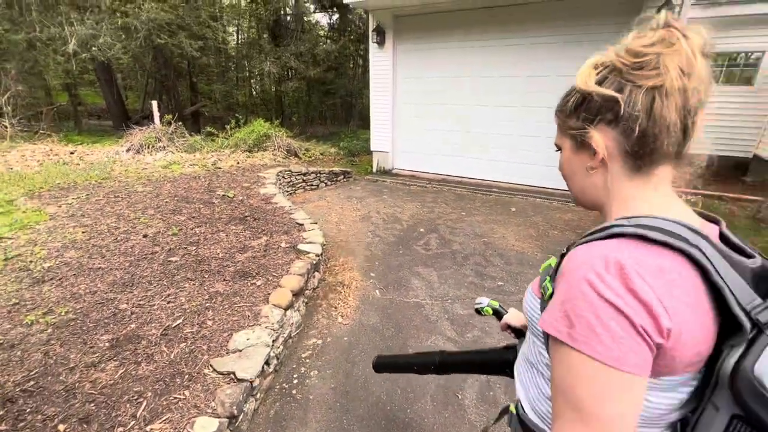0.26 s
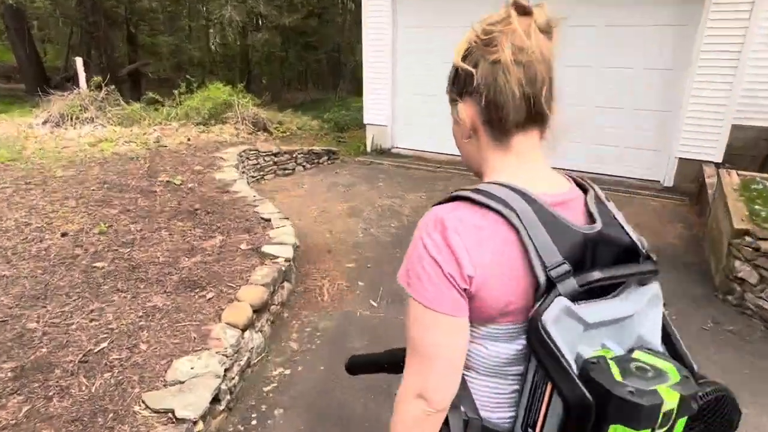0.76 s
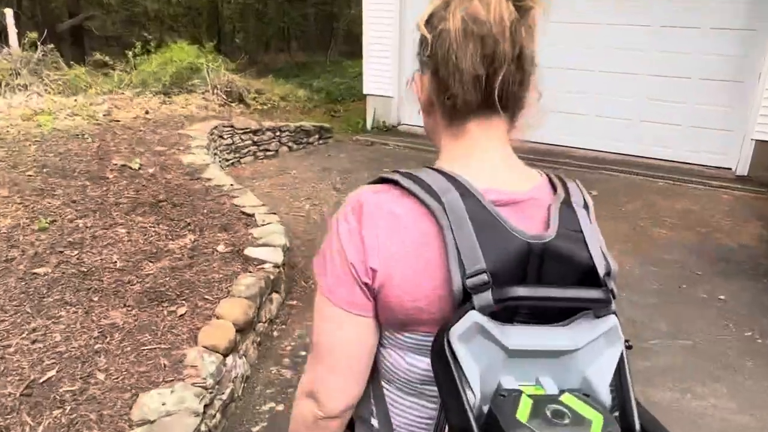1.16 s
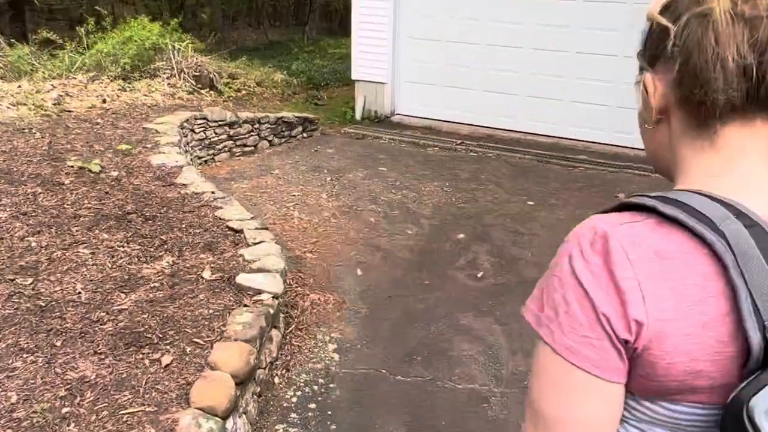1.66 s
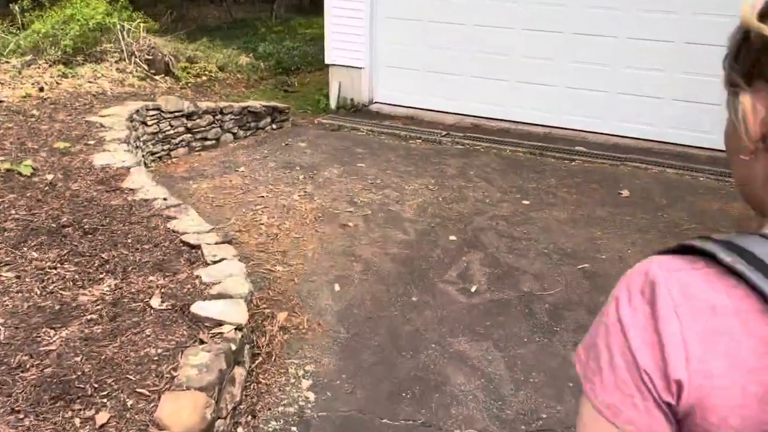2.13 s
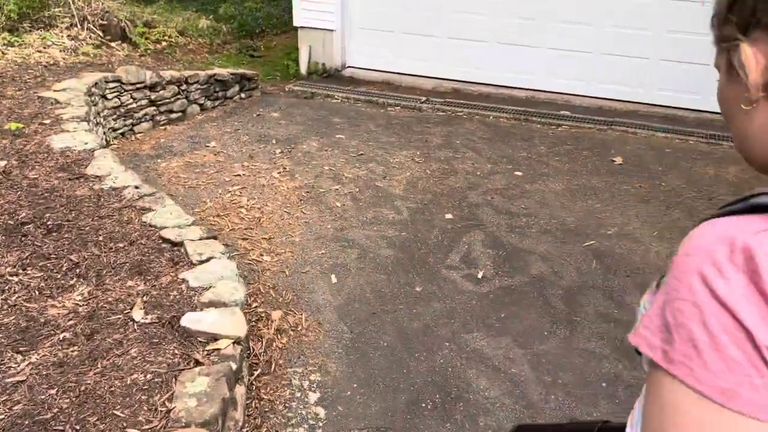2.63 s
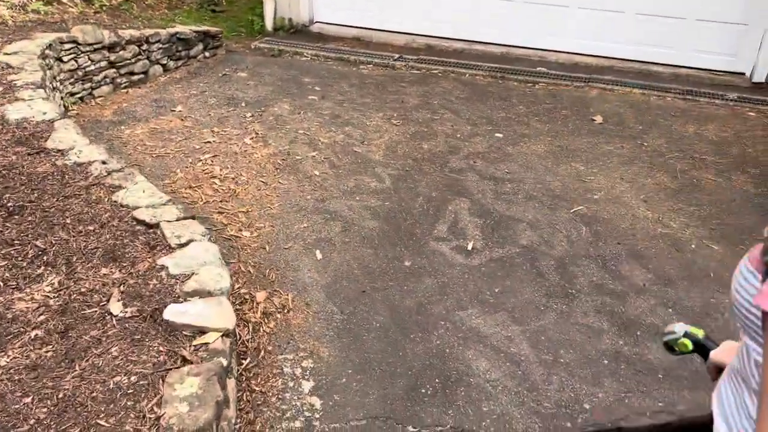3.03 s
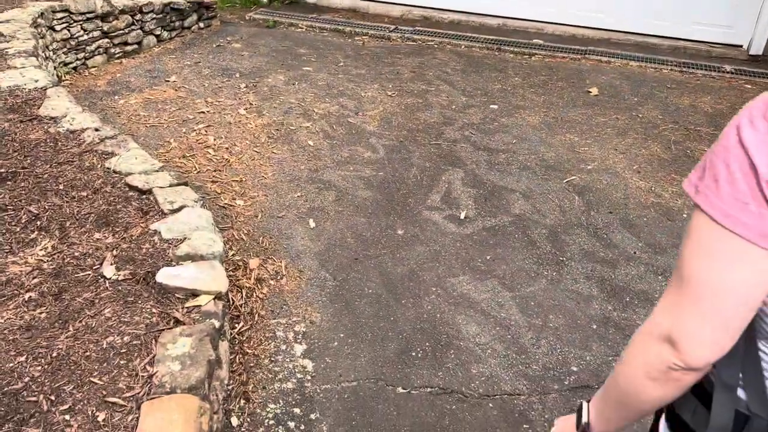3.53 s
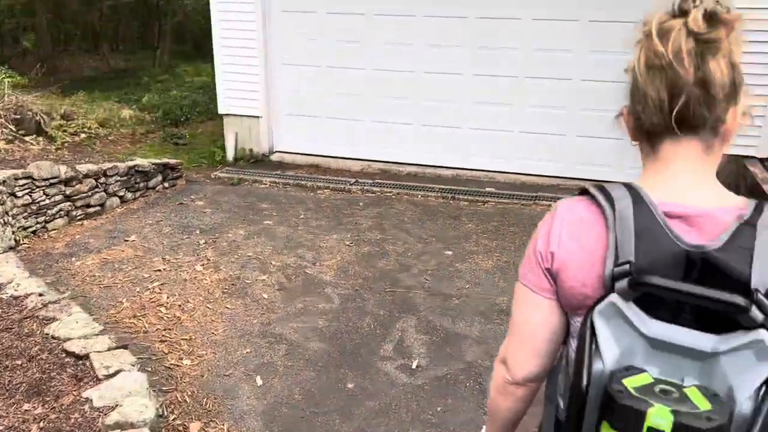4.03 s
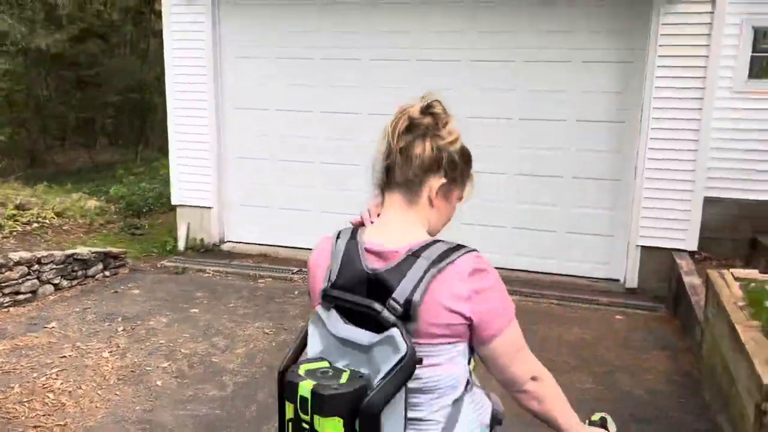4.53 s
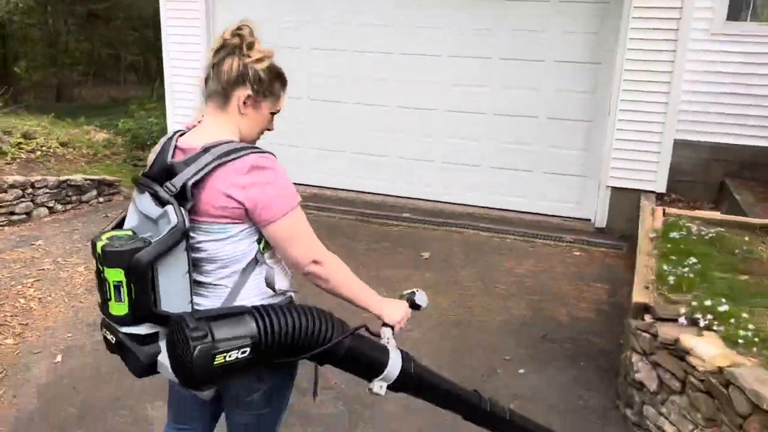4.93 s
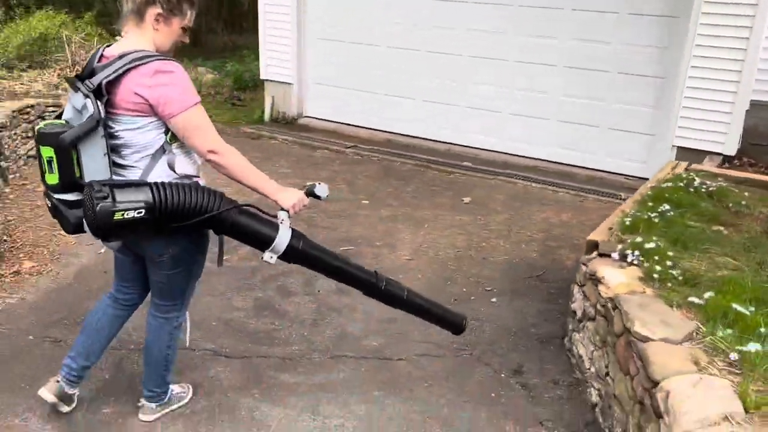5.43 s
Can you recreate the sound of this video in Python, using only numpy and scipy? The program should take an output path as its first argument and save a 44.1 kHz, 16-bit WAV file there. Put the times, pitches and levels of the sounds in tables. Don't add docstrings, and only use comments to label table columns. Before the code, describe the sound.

A battery backpack leaf blower runs for the whole stretch, about 5.7 seconds, outdoors on a paved drive, a step or two from a hand-held stereo phone. It is already at constant speed, with no start or stop. A dense, broad hiss of turbulent air leads, coloured by hollow tube and housing resonances, over a steady motor hum near 700 Hz and a thin whine around 8.5 kHz that trembles and fades irregularly. At first there is some low jet rumble and the sound is wide and near. From 0.7 to 1.3 seconds the hiss swells brighter as the pack faces the phone. It dulls from about 2 to 3.5 seconds, leaning right, then brightens again around 4 to 4.5. After 4.8 the treble eases, the jet rumble returns, and the sound shifts left. A short paving reflection adds slight moving hollowness.

```python
import sys
import numpy as np
from scipy import signal
from scipy.fft import rfft, irfft
from scipy.io import wavfile
from scipy.ndimage import uniform_filter1d

SR = 44100
rng = np.random.default_rng(int(sys.argv[2]) if len(sys.argv) > 2 else 0)


def nominal_scale(level):
    x = np.asarray(level, float) / 20
    return 10 ** x


def generate_wav(signal):
    frames = np.transpose(np.atleast_2d(signal))
    scaled = np.clip(frames, -1, 1) * 32767
    pcm = np.round(scaled).astype(np.int16)
    wavfile.write(sys.argv[1], SR, pcm)


N = 250929
FRAME, HOP = 512, 128


def in_time(rows, s):
    t, *columns = np.transpose(rows)
    return np.array([np.interp(s, t, column) for column in columns])


def at_hz(points, hz):
    at, value = np.array(points)[:, 0], np.array(points)[:, 1]
    return np.interp(np.log(hz + 1), np.log(at), value)


def in_pitch(rows, hz):
    at, *columns = np.transpose(rows)
    return [at_hz(np.c_[at, column], hz)[:, None] for column in columns]


def across(centres, columns, hz):
    blend = np.array([at_hz(np.c_[centres, row], hz) for row in np.eye(len(centres))])
    return blend.T @ columns


def bump(hz, centre, width):
    return 1 / (1 + (2 * (hz - centre) / width) ** 2)


def drift(rate, per_s, count, size):
    r = np.exp(-2 * np.pi * rate / per_s)
    noise = rng.standard_normal((count, 2 * size))
    slow = signal.lfilter([1], [1, -2 * r, r * r], noise)[:, size:]
    return slow / slow.std(axis=1, keepdims=True)


def patches(rate, hz, s):
    centres = np.linspace(17, 127, 70) ** 2
    return across(centres, drift(rate, SR / HOP, count=70, size=len(s)), hz)


def frames(x):
    return signal.stft(x, SR, nperseg=FRAME, noverlap=FRAME - HOP)


# start_s, extra_path_ms
PAVING_ECHO = [
    (0, 3.0),
    (1, 2.6),
    (2, 3.2),
    (3.4, 3.4),
    (4.3, 2.4),
    (5, 3.0),
    (5.69, 3.3),
]
PAVING_SHARE = .3


def paving(hz, s):
    lag_s = in_time(PAVING_ECHO, s)[0] / 1000
    return 1 + PAVING_SHARE * np.exp(-2j * np.pi * hz[:, None] * lag_s)


# start_s, intake_facing_db, grille_aim_db, blade_tips_in_sight_db, shroud_in_sight_db
PACK_TURNS = [(0.0, -28, -5.5, -3.5, -6), (0.05, -27.5, -6.5, -4, -4.5), (0.22, -26, -5, -6, -2.5),
              (0.6, -26, -3.5, -2.5, -2), (0.73, -20.5, -2, -6.5, -9), (0.9, -17.5, -3.5, -5, -7.5),
              (1.39, -22, -4.5, -9.5, -10), (1.95, -30.5, -4.5, -5, -7.5), (2.38, -26, -8.5, -9.5, -5),
              (2.62, -31.5, -5, -6.5, -6.5), (3.25, -33, -4.5, -5.5, -6), (3.61, -27.5, -8, -4.5, -5),
              (3.9, -23.5, -8, -8.5, -6.5), (4.26, -21, -4, -7.5, 0), (4.53, -25, -3.5, -2, 1),
              (4.66, -27.5, -2, -4.5, -1.5), (4.83, -30, -5.5, -3, -4), (5.69, -34, -6, -5, -8)]
# start_s, jet_db, tube_mouth_db
TUBE_SWINGS = [(0.0, -43, -36.5), (0.65, -49, -36.5), (0.97, -46.5, -37), (1.08, -54, -39),
               (1.39, -59.5, -44), (1.92, -57.5, -39), (2.44, -55.5, -44.5), (2.54, -56.5, -39),
               (3.77, -53, -41.5), (3.85, -58.5, -40.5), (4.48, -54, -36.5), (4.77, -51, -41.5),
               (4.82, -44, -42), (4.88, -46, -44.5), (5.28, -45, -50), (5.32, -42, -47.5), (5.63, -51, -50),
               (5.69, -54, -52)]


def movements(s):
    moves = np.vstack([in_time(PACK_TURNS, s), in_time(TUBE_SWINGS, s)])
    return moves - moves.mean(axis=1, keepdims=True)


# start_s, blade_pitch_hz
SHAFT_SPEED = [(0, 8562), (.55, 8568), (.7, 8540), (.92, 8570), (1.05, 8595), (1.3, 8600), (1.45, 8560),
               (2.2, 8568), (2.52, 8558), (2.72, 8590), (3.3, 8570), (3.95, 8565), (4.22, 8590),
               (4.34, 8535), (4.5, 8585), (4.65, 8550), (5.3, 8542), (5.69, 8595)]


def blade_pitch(s):
    return in_time(SHAFT_SPEED, s)[0]


# multiple, level_db
SHAFT_ORDERS = [
    (1, 0),
    (2, -12),
    (3, -10),
    (4, -12),
    (6, -12),
    (7, -7),
    (10, -13),
]
# start_s, level_db
CASING_LEVEL = [(0.0, -39.5), (0.08, -38), (0.95, -40.5), (1.06, -46), (3.34, -44.5), (3.42, -39),
                (3.56, -48), (4.26, -43.5), (4.44, -55.5), (4.61, -39.5), (4.71, -43), (4.8, -50),
                (5.09, -43), (5.69, -45)]
HUM_LIFT_DB = 2.5
WHINE_ORDER = 12


def motor_hum():
    s = np.arange(N) / SR
    steady_hz = uniform_filter1d(blade_pitch(s), SR // 6, mode="nearest") / WHINE_ORDER
    turn = 2 * np.pi * np.cumsum(steady_hz) / SR
    fading = 0.56 * drift(8.2, SR / HOP, count=len(SHAFT_ORDERS), size=N // HOP + 1)
    fading = fading.repeat(HOP, axis=1)[:, :N]
    fading[0] *= .3
    hum = 0
    for (multiple, level_db), fade_db in zip(SHAFT_ORDERS, fading):
        hum = hum + nominal_scale(level_db + fade_db) * np.sin(multiple * turn + multiple * multiple)
    return np.sqrt(2) * nominal_scale(in_time(CASING_LEVEL, s)[0] + HUM_LIFT_DB) * hum


# centre_s, half_length_s, depth_db
WHINE_FADES = [(0, 0.11, -10), (0.37, 0.33, -8), (0.703, 0.14, -28), (1.4, 0.14, -14), (1.72, 0.26, -23),
               (2.022, .06, -23), (2.62, .08, -13), (2.85, 0.32, -4), (3.032, 0.13, -47),
               (3.337, 0.46, -12.5), (4.004, 0.07, -16), (4.308, 0.039, -6), (4.594, .04, -20),
               (4.73, 0.089, -22), (4.867, .06, -17), (4.993, .04, -13), (5.116, .1, -6),
               (5.342, 0.032, -13), (5.507, 0.054, -6), (5.585, 0.023, -2)]
WHINE_DB, WHINE_BY_FACING = -33.5, 0.84
SWAY_HZ, FLUTTER_HZ, FLICKER_DB = 10.17, 14, 2.3


def blade_whine():
    s = np.arange(N) / SR
    faded_db = sum(db * np.clip(1 - np.abs(s - at) / half, 0, 1) for at, half, db in WHINE_FADES)
    level_db = WHINE_DB + WHINE_BY_FACING * movements(s)[0] + faded_db
    flutter, flicker = drift(40, SR, count=2, size=N)
    flutter = flutter - uniform_filter1d(flutter, SR // 16)
    sway = drift(6, SR, count=1, size=N)[0]
    pitch_hz = blade_pitch(s) + SWAY_HZ * sway + FLUTTER_HZ * flutter
    phase = 2 * np.pi * np.cumsum(pitch_hz) / SR
    return np.sqrt(2) * nominal_scale(level_db + FLICKER_DB * flicker) * np.sin(phase)


# pitch_hz, level_db (per Hz)
AIR_SPECTRUM = [(20, -59), (60, -38), (130, -14), (650, -16.5), (1150, -16.5), (1700, -9), (3300, -9),
                (4400, -8.5), (5600, -7), (7700, -8), (9700, -11), (12200, -11.5), (14300, -11),
                (15800, -13)]
# pitch_hz, width_hz, rise_db
HOUSING_MODES = [(479, 99, 9), (694, 100, 6.5), (762, 52, -2.5), (994, 120, 7.5), (1126, 77, -3),
                 (1250, 79, 5), (1419, 112, 10), (1620, 46, -8), (1650, 77, 4.5), (1860, 390, 5.5),
                 (2053, 140, -3), (2406, 550, 6), (4730, 620, 4), (6122, 840, 10), (11660, 240, 3.5),
                 (12900, 320, 5), (15500, 520, 2), (2870, 82, 3.5), (4260, 180, 4.5)]
AIR_DB, CUTOFF_HZ = -24, 15760


def turbulence():
    hz = np.arange(N // 2 + 1) * SR / N
    resonance_db = sum(rise_db * bump(hz, at, width) for at, width, rise_db in HOUSING_MODES)
    colour = nominal_scale(at_hz(AIR_SPECTRUM, hz) + resonance_db) * (hz < CUTOFF_HZ)
    air = irfft(rfft(rng.standard_normal((2, N))) * colour, N)
    return nominal_scale(AIR_DB) * air / air.std()


# pitch_hz, share (dB per dB)
FACING_SHARE = [(970, 0), (1210, .5), (1430, 0), (1760, 0.98), (3400, 0.66), (6050, 1.0), (7600, 1.3),
                (10000, 1.0)]
GRILLE_SHARE = [(1430, -0.44), (1760, -1.16), (4500, -.8), (6050, 1.0), (7600, -0.42), (10000, -0.26),
                (12400, 0.23), (14800, -.9)]
TIPS_SHARE = [(190, -0.32), (460, -0.35), (2450, 0.13), (3400, 0.094), (6050, -0.26), (8600, 0.39),
              (10000, 1.3), (12400, 1.1)]
SHROUD_SHARE = [(970, -0.15), (1210, 0.51), (1430, 0.43), (2450, -0.59), (3400, 0.43), (4500, 0.8),
                (6050, 0)]
JET_SHARE = [(60, 1), (120, -0.085), (250, 1.0), (460, 0.43), (715, 0.31), (970, -0.025), (1430, -0.055)]
MOUTH_SHARE = [(460, .1), (970, 0.82), (1210, -0.34), (1430, 1.0), (1760, 0.09), (3400, 0.36),
               (7600, -0.024), (10000, -0.31)]
PATCHY_DB, SWIRL_DB = 1.5, 0.17


def swell(hz, s):
    followed = (FACING_SHARE, GRILLE_SHARE, TIPS_SHARE, SHROUD_SHARE, JET_SHARE, MOUTH_SHARE)
    shares = np.array([at_hz(share, hz) for share in followed])
    level_db = shares.T @ movements(s)
    level_db = level_db - 10 * np.log10(np.mean(nominal_scale(2 * level_db), axis=1, keepdims=True))
    swirl = drift(8.3, SR / HOP, count=1, size=len(s))
    return nominal_scale(level_db + PATCHY_DB * patches(2.85, hz, s) + SWIRL_DB * swirl)


# start_s, end_s, start_hz, end_hz, depth_db
DROP_OUTS = [(0, .3, 3280, 3220, -24), (0, .45, 7200, 7200, -30), (0, .18, 2250, 2200, -19),
             (.42, .65, 2650, 3050, -17), (.55, .8, 10000, 9600, -16), (.75, .88, 15000, 14600, -16),
             (.88, 1.2, 3620, 3480, -19), (.9, 1.2, 9800, 10100, -22), (1.17, 1.7, 3370, 3260, -26),
             (1.2, 2, 10000, 9700, -12), (1.3, 1.85, 15200, 15600, -14), (1.76, 1.98, 3380, 3080, -21),
             (.95, 1.6, 7650, 8150, -11), (2, 2.4, 3330, 3520, -14), (1.86, 1.96, 4000, 3930, -14),
             (2.52, 2.65, 10700, 10700, -17), (3.4, 3.9, 3500, 3150, -10), (3.7, 3.8, 10000, 10000, -15),
             (4, 4.28, 14600, 11700, -10), (4.58, 4.75, 820, 820, -25), (4.85, 5.02, 3050, 3150, -14),
             (5, 5.4, 820, 820, -25), (5.32, 5.45, 3600, 3600, -12), (5.35, 5.44, 5550, 5550, -11)]
NOTCH_HZ, NOTCH_SHARE = 35, .002


def cancelled(hz, s):
    listed = 0
    for start, end, from_hz, to_hz, depth_db in DROP_OUTS:
        width = NOTCH_HZ - NOTCH_SHARE * from_hz * depth_db
        on = np.clip(np.minimum(s - start, end - s) / .06 + .5, 0, 1)
        glide_hz = np.interp(s, [start, end], [from_hz, to_hz])
        listed = listed + depth_db * on * bump(hz[:, None], glide_hz, width)
    narrow = across(np.linspace(2000, 16000, 140), drift(5, SR / HOP, count=140, size=len(s)), hz)
    stray = 13 * np.maximum(narrow - .95, 0) * (hz > 2000)[:, None]
    return listed * (1 + .2 * narrow) - stray


# start_s, bearing (below 0 right, above 0 left), nearness_db, phone_roll (-1 to 1)
PACK_PLACE = [(0, -0.42, 12.5, 0.022), (.6, -0.35, 12, 0.053), (.9, -0.43, 6, 0.57),
              (1.12, -0.27, -2, 0.97), (1.35, -1.1, -6, .95), (1.7, -1.7, -4.5, 0.78),
              (2.1, -0.81, -1, -0.6), (2.4, -0.68, -0.5, -0.28), (2.75, -0.57, 1.5, -0.31),
              (3.1, -0.6, 1.5, -0.072), (3.6, -1.15, 0, -0.55), (3.95, -0.8, -4, -0.19),
              (4.2, 0.077, -1, .2), (4.35, -0.19, -8.5, .2), (4.55, 0.31, -3.5, -.2), (4.9, 1, -3.5, -0.17),
              (5.69, 1, -4, -.1)]
# pitch_hz, level_db
PORT_DIFFERENCE = [(60, -15), (250, -22), (700, -12.5), (1300, -10.5), (2400, -4.5), (3300, -2), (4400, -5),
                   (6200, -2.5), (7200, -6.5), (8300, -8.5), (9300, -3), (10300, -0.5), (13000, -4),
                   (16000, -2)]
# pitch_hz, dead_ahead_null_share, by_nearness, by_facing, by_jet (dB per dB)
WIDENING = [(200, 0.28, 0.9, 0.052, -0.63), (900, 1.0, 0.8, -0.041, 0.35), (2390, 0.43, .8, -0.4, -0.16),
            (3400, 0.1, 0.4, 0.058, -0.14), (4500, 0.24, -0.1, 0.032, 0.18), (6100, 0.12, 0, -0.58, 0.61),
            (7500, 0.14, 0, -0.4, 0.36), (9550, 0.22, 0.4, 0, -0.22)]
# pitch_hz, at_rest, per_bearing, per_roll, per_nearness_db
LEFT_LEAN = [(300, -0.36, 0, 0.13, 0), (1200, -0.04, 0.65, 0.13, 0), (2700, 0.3, 0.75, 0.56, 0.02),
             (4700, -0.23, 0.22, -0.54, 0), (6100, -0.065, 0.079, -0.76, 0), (8600, 0.46, 0, -0.54, 0),
             (12000, 0.49, 0.11, 0.099, .06)]
# pitch_hz, lead_per_bearing
LEFT_LEAD = [(200, .1), (700, 1), (2500, 0.41), (3400, 1), (4500, .6), (6100, .3), (8000, 0)]
AHEAD_BLUR, BEARING_KNEE = 0.18, 0.7
WANDER, SPLIT_DB = .7, 2.5


def port_width(hz, s):
    bearing, near_db, _ = in_time(PACK_PLACE, s)
    facing, _, _, _, jet, _ = movements(s)
    by_null, by_near, by_facing, by_jet = in_pitch(WIDENING, hz)
    null_db = 10 * np.log10(bearing ** 2 + AHEAD_BLUR ** 2)
    null_db = null_db - null_db.mean()
    spread_db = by_null * null_db + by_near * near_db + by_facing * facing + by_jet * jet
    return nominal_scale(at_hz(PORT_DIFFERENCE, hz)[:, None] + spread_db + SPLIT_DB * patches(4.3, hz, s))


def port_tie(hz, s):
    bearing, near_db, roll = in_time(PACK_PLACE, s)
    rest, by_bearing, by_roll, by_close = in_pitch(LEFT_LEAN, hz)
    aside = np.tanh(bearing / BEARING_KNEE)
    lean = rest + by_bearing * aside + by_roll * roll + by_close * near_db
    lead = at_hz(LEFT_LEAD, hz)[:, None] * aside
    wander = WANDER * (.5 * patches(1.0, hz, s) + 1j * patches(1.0, hz, s))
    tie = lean + 1j * lead + wander
    return tie / np.maximum(np.abs(tie) / .95, 1)


def ports(direct, scattered, lines, hz, s):
    tie = port_tie(hz, s)
    unrelated = np.sqrt(1 - np.abs(tie) ** 2) * scattered
    side = port_width(hz, s) * (tie * (direct + lines) + unrelated)
    loss = nominal_scale(cancelled(hz, s))
    middle_band = (hz[:, None] > 1000) & (hz[:, None] < 8000)
    mid = direct * loss + lines * np.where(middle_band, loss, 1)
    left_right = np.array([mid + side, mid - side])
    return signal.istft(left_right, SR, nperseg=FRAME, noverlap=FRAME - HOP)[1][:, :N]


def scene():
    hz, s, air = frames(turbulence())
    direct, scattered = air * swell(hz, s) * paving(hz, s)
    lines = frames(motor_hum() + blade_whine())[2]
    return ports(direct, scattered, lines, hz, s)


def roll_off(x):
    return signal.sosfilt(signal.butter(12, 17020, fs=SR, output="sos"), x)


def record(dry):
    return roll_off(dry)


dry = scene()
out = record(dry)
generate_wav(out)
```